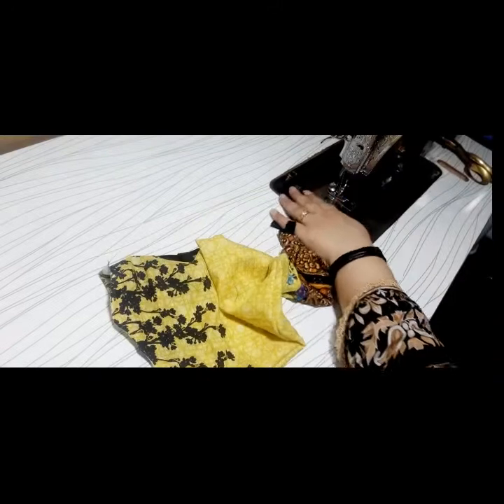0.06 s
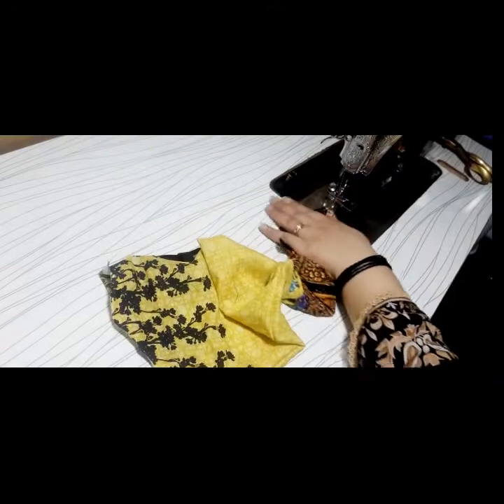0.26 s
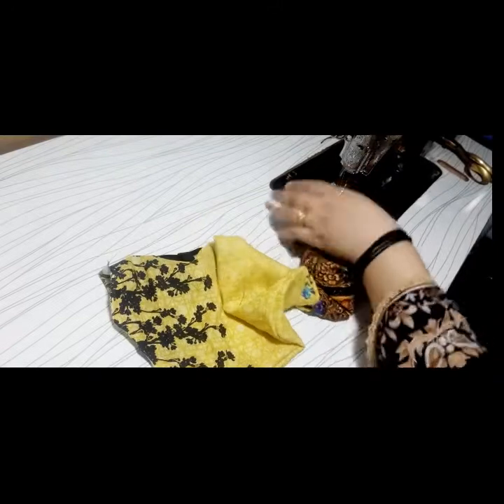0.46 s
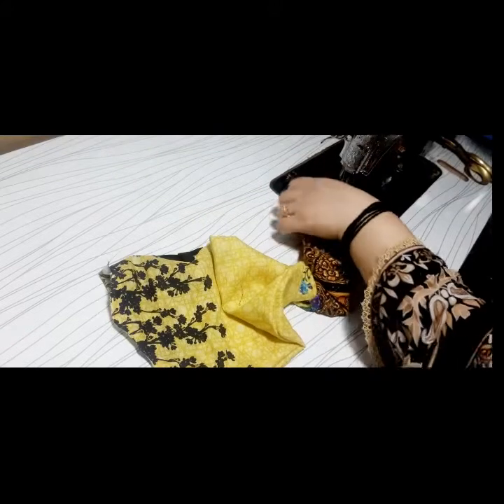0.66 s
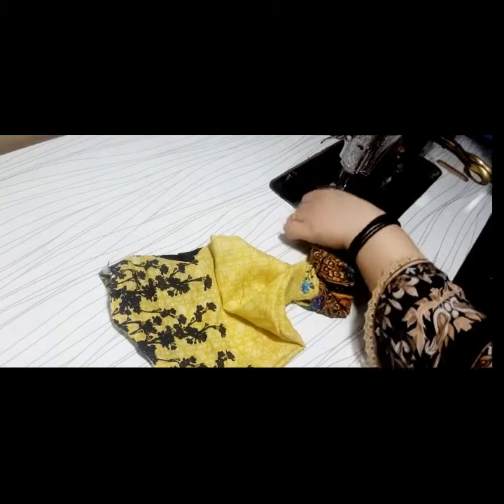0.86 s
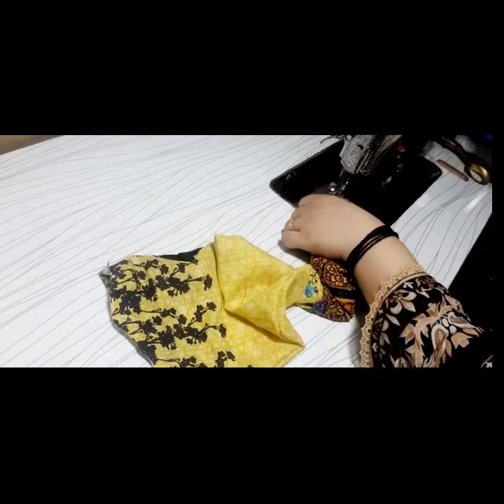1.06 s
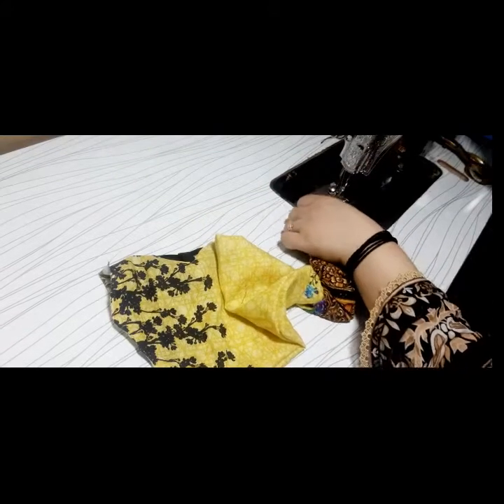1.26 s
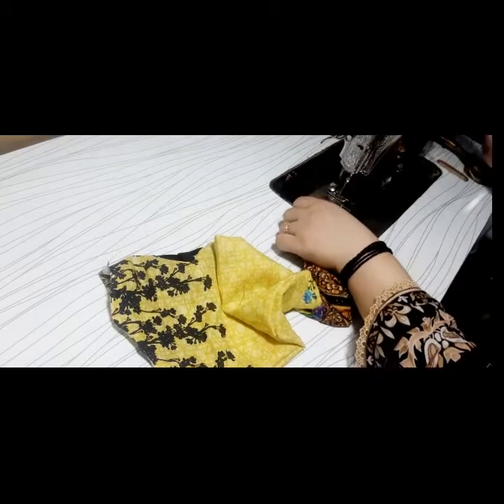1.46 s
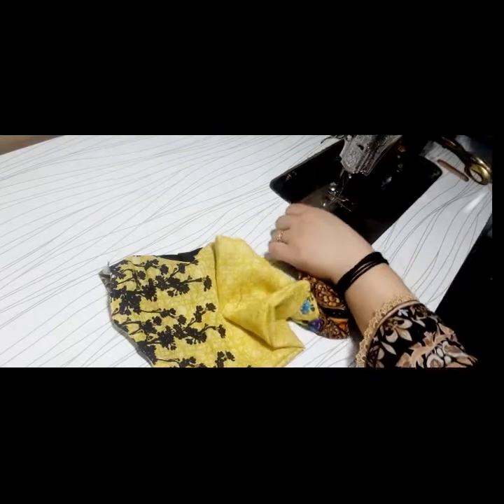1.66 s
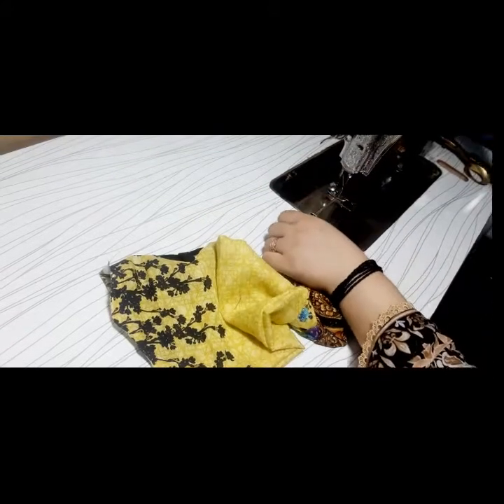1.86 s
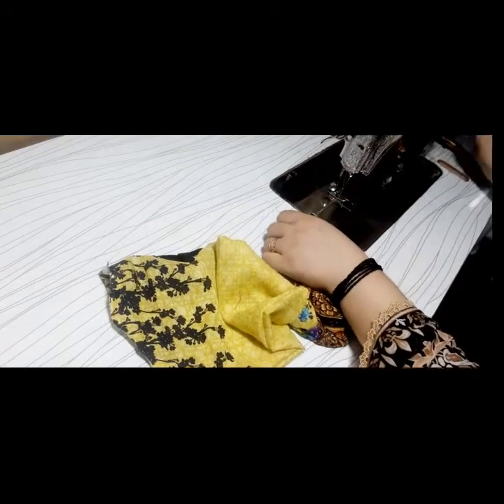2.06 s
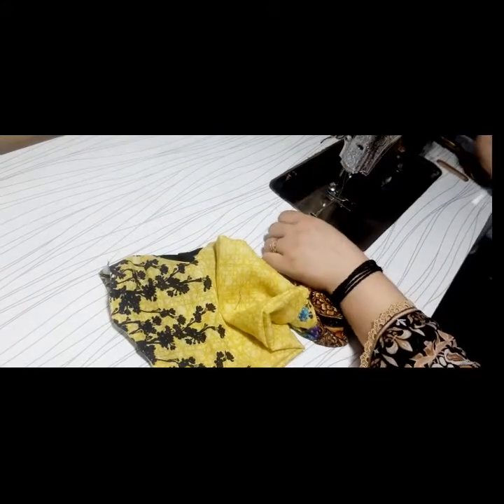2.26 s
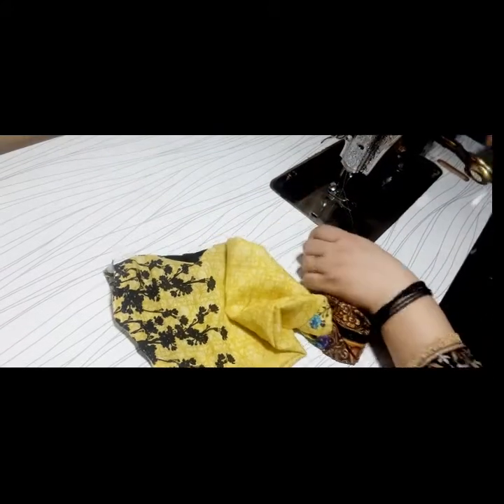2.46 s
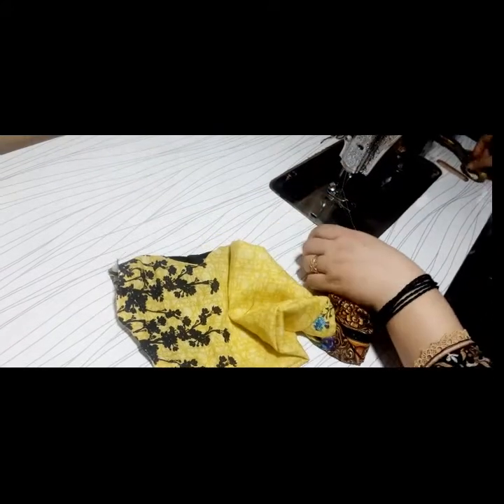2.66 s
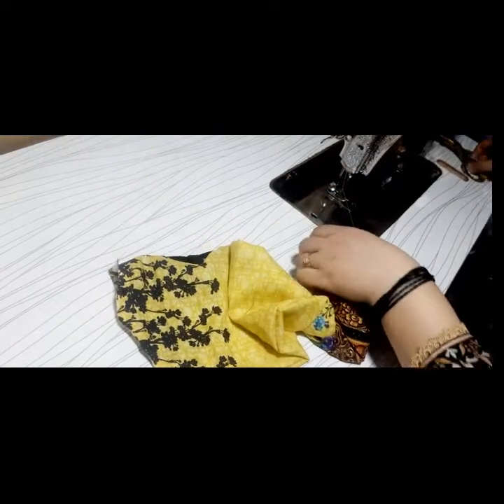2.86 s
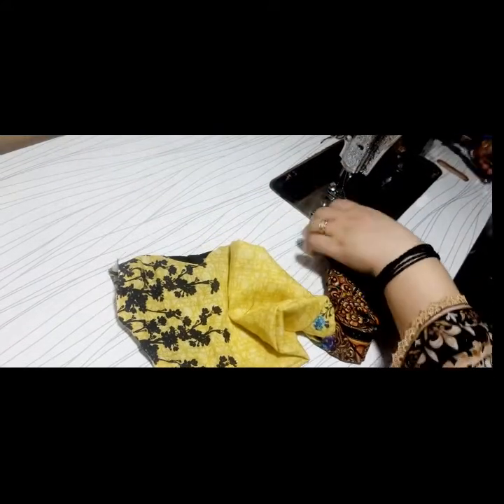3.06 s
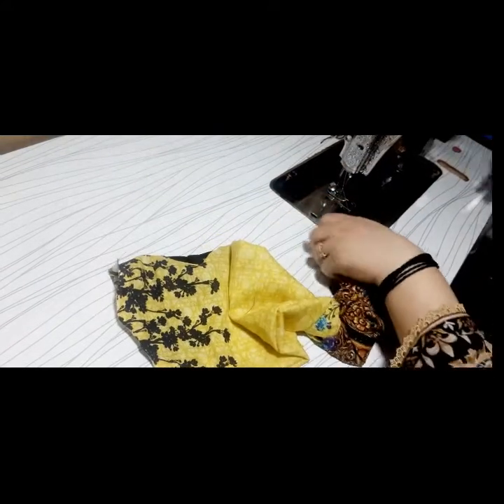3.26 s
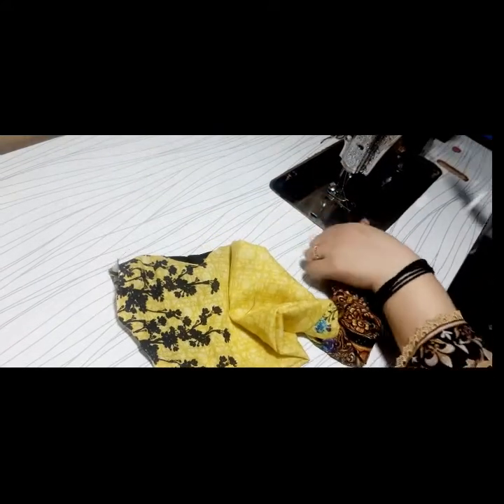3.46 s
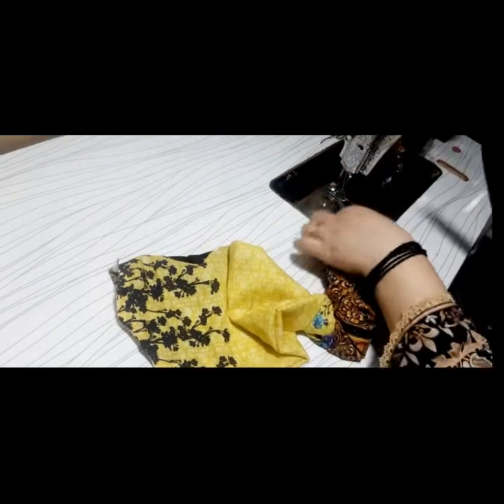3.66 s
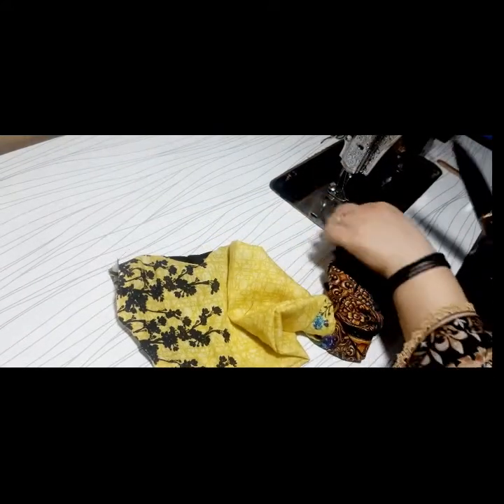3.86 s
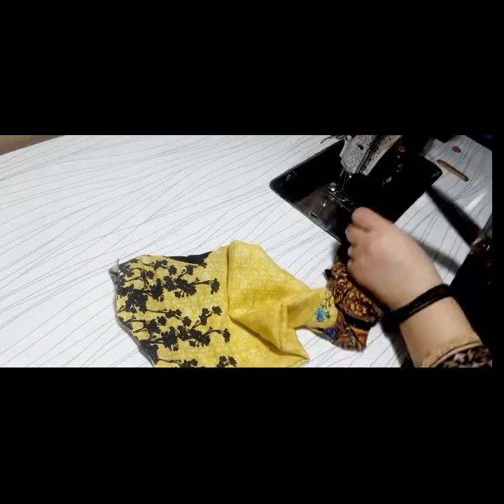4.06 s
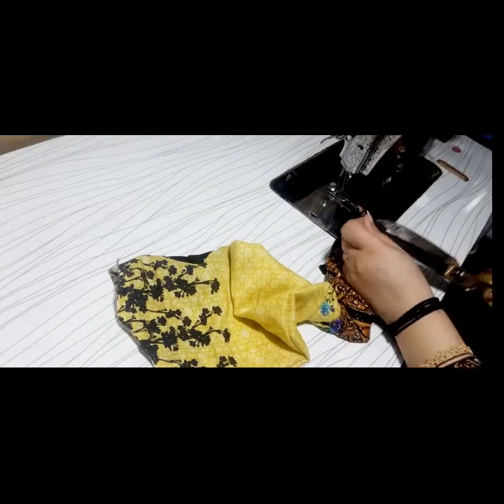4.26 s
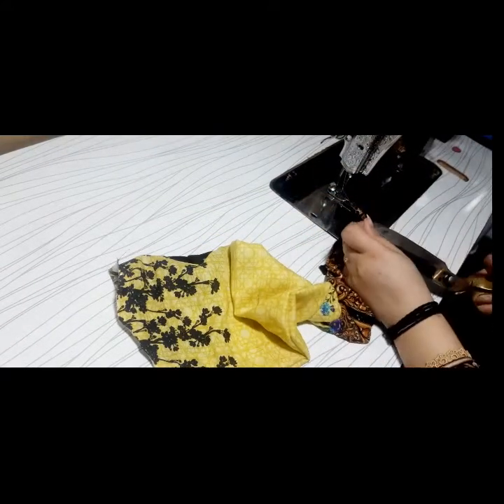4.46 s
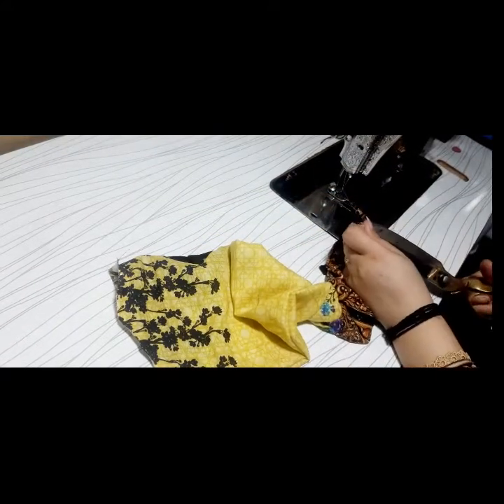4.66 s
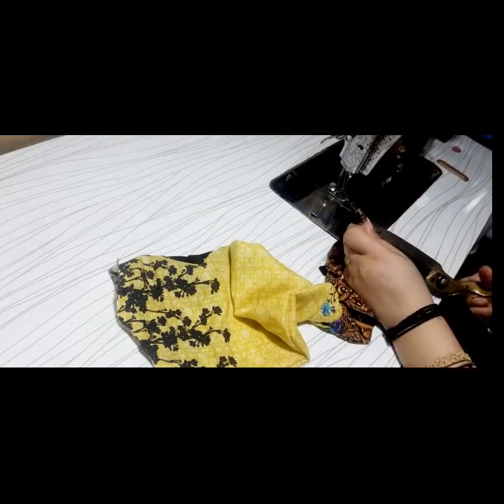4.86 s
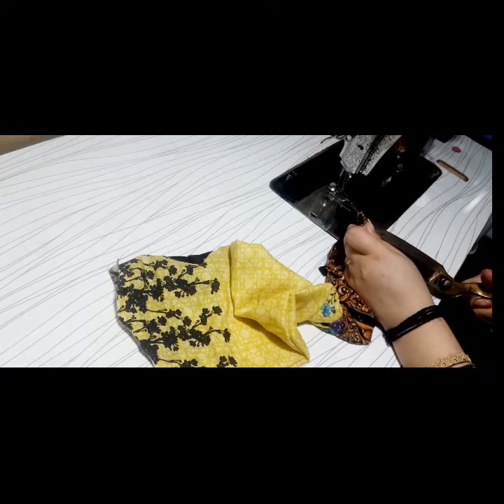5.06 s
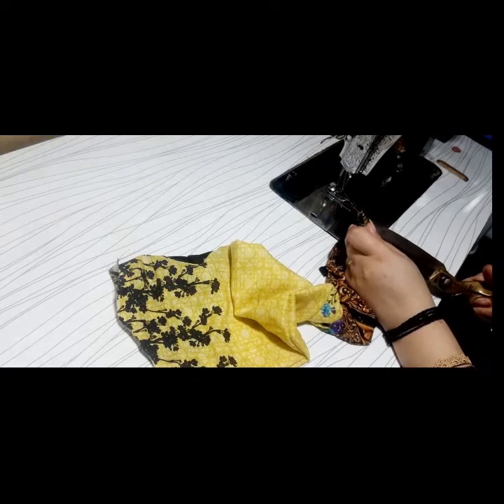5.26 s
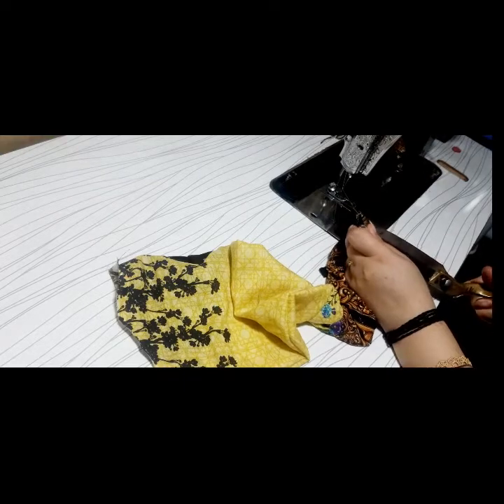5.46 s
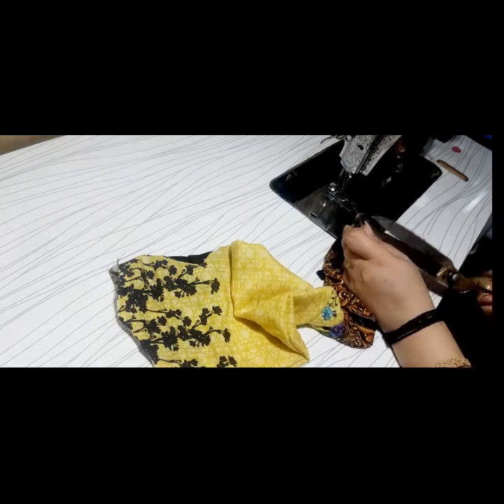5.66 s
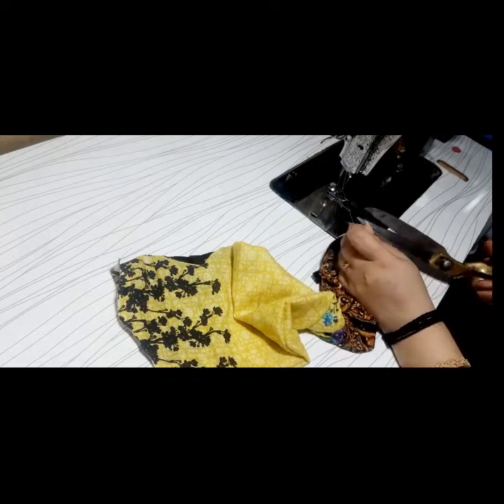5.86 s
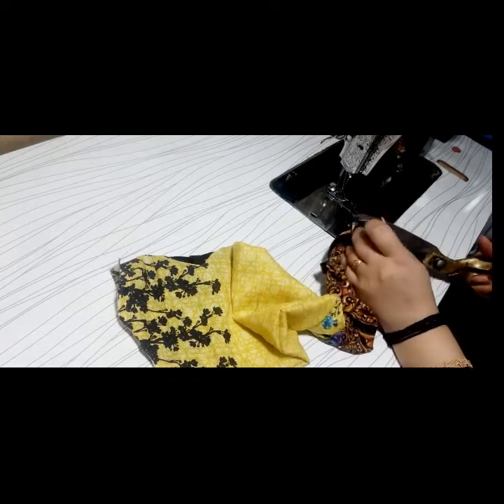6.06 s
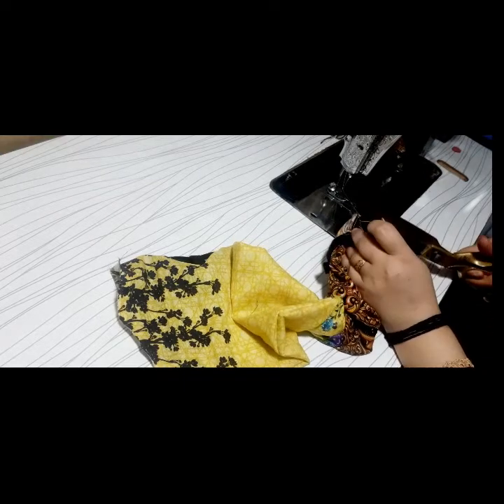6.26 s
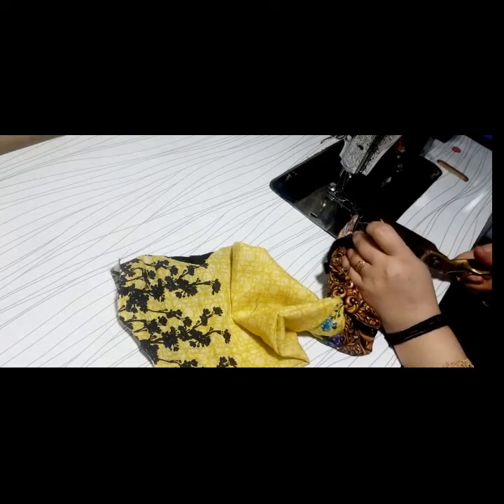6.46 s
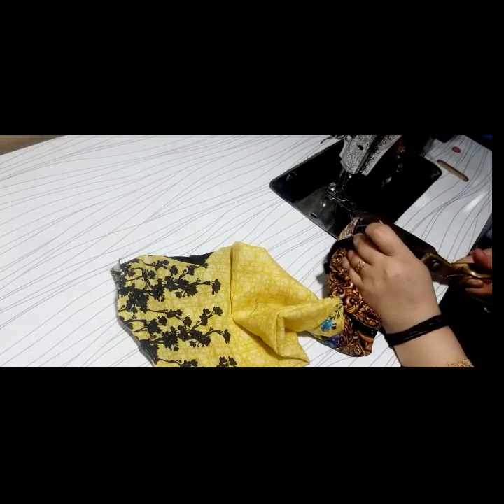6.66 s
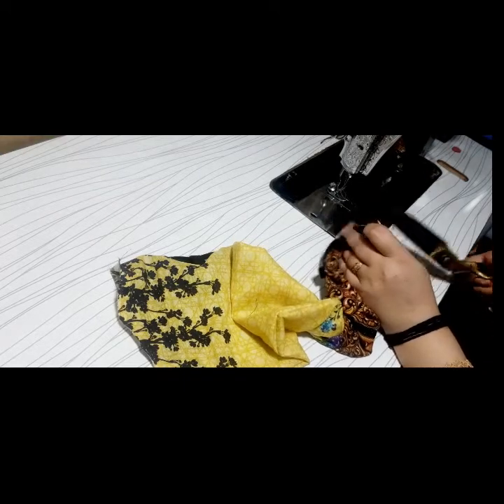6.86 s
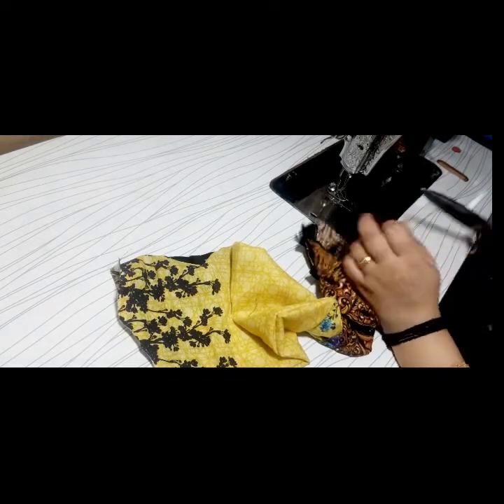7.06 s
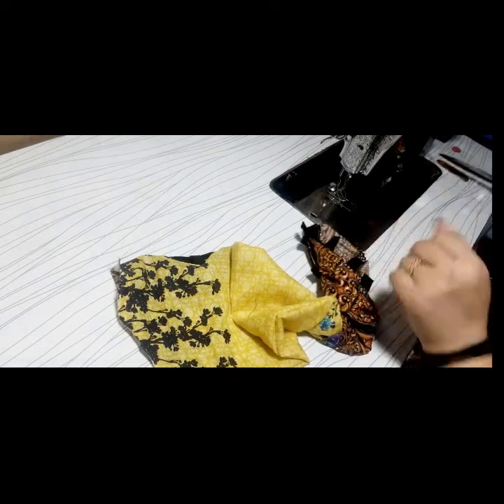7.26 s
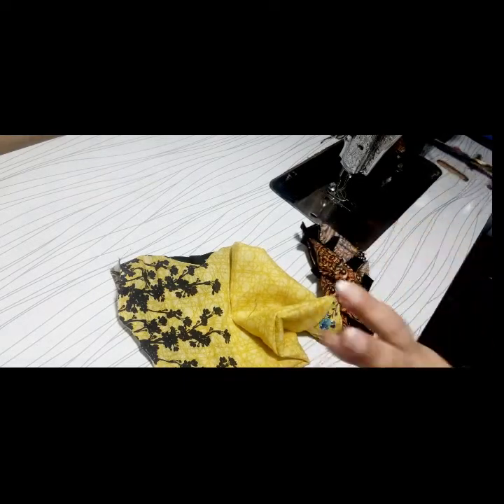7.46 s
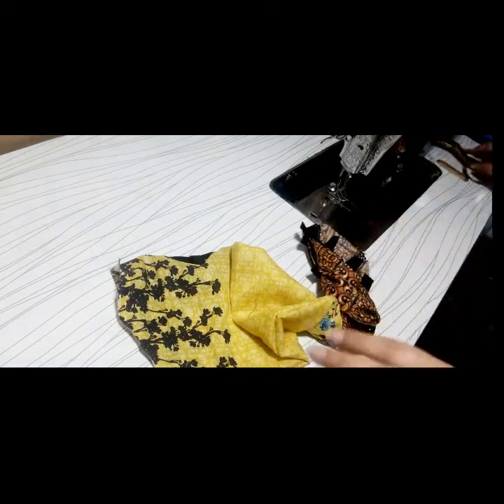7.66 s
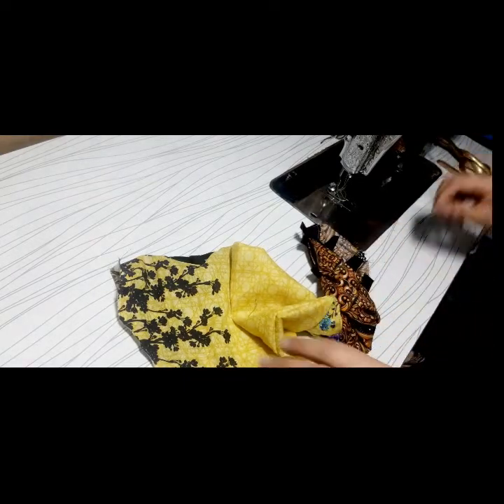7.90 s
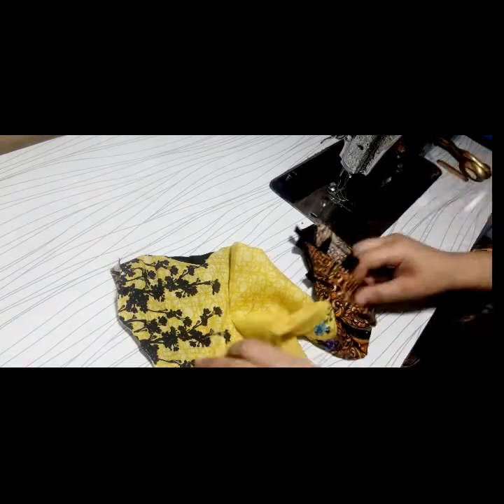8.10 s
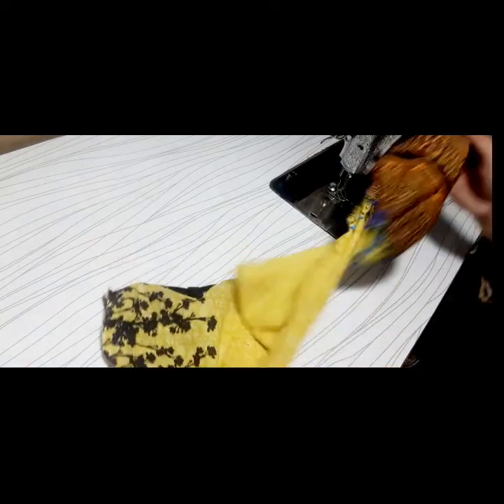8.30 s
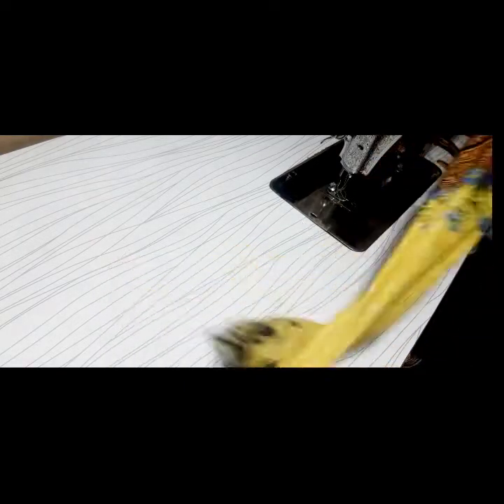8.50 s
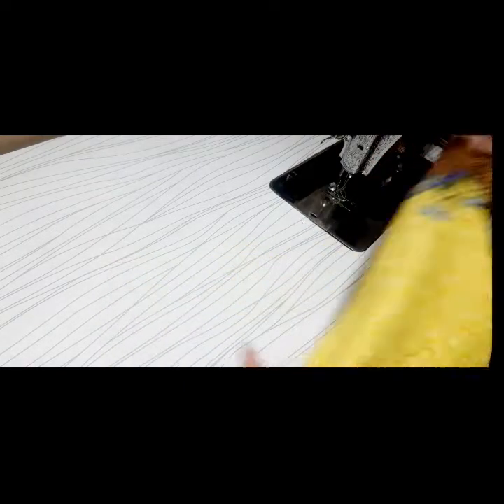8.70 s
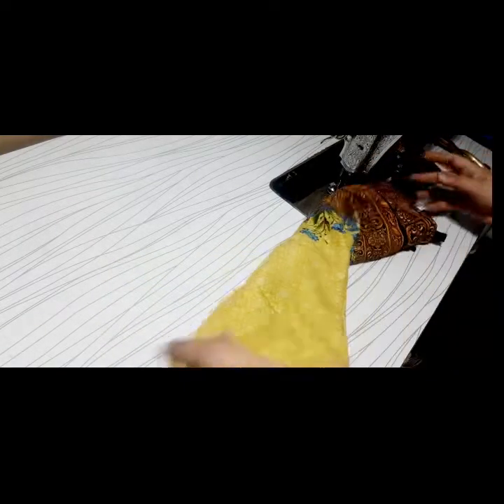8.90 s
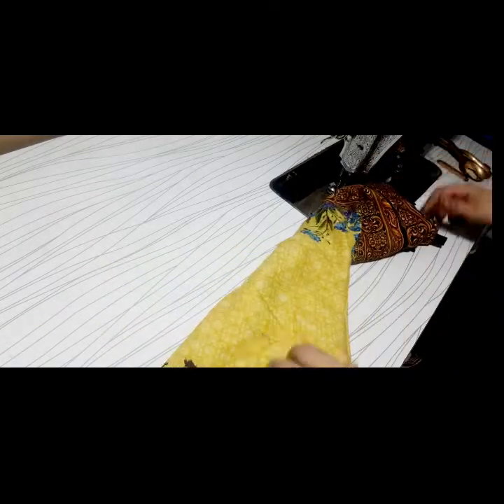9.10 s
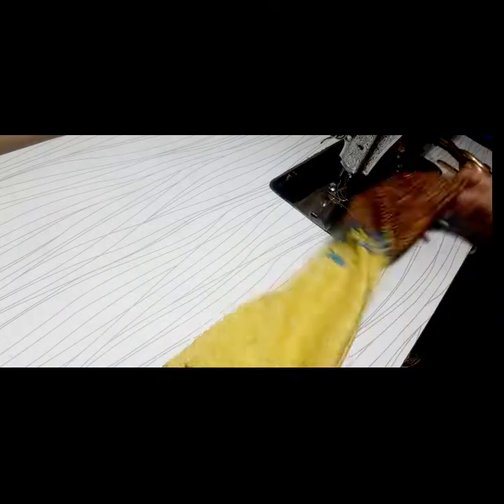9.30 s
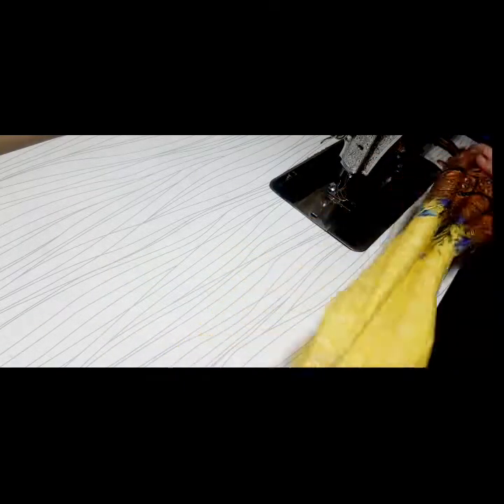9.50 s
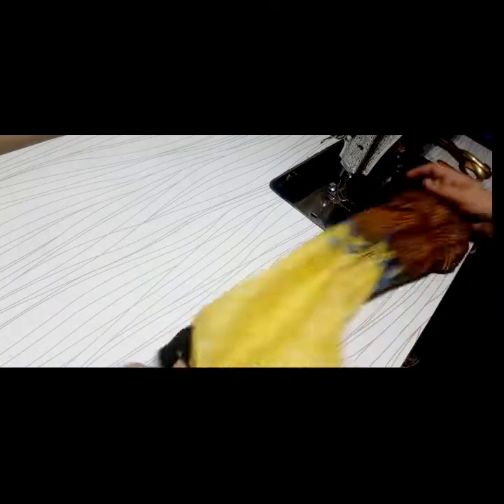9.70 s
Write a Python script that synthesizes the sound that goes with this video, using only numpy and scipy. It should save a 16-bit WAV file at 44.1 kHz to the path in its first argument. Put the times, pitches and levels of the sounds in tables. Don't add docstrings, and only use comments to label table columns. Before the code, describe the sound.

Scissors knock sharply off a wooden table, snip a thread, and land with a hard clack, over rubbing cloth, fan hum and faint cricket chirps.

```python
import sys
import numpy as np
from scipy import signal
from scipy.fft import rfft, irfft, next_fast_len
from scipy.io import wavfile
from scipy.ndimage import uniform_filter1d

SR = 44100
rng = np.random.default_rng(int(sys.argv[2]) if len(sys.argv) > 2 else 0)


def log_audio(samples):
    frames = np.atleast_2d(samples).T
    limited = np.clip(frames, -1, 1)
    pcm = np.round(limited * 32767).astype(np.int16)
    wavfile.write(sys.argv[1], SR, pcm)


def makeup_ratio(level_db):
    decades = np.asarray(level_db, float) / 20
    return 10 ** decades


N = 429534


def evened(x):
    return x / np.sqrt(np.mean(x ** 2) + 1e-20)


def read(points, hz):
    f, value = np.transpose(points)
    return np.interp(np.log(hz + 1), np.log(f + 1), value)


def coloured(z, points):
    gain = makeup_ratio(read(points, np.fft.rfftfreq(len(z), 1 / SR)))
    return evened(irfft(rfft(z) * gain, len(z)))


def add(mix, s, sound):
    part = mix[round(s * SR):][:len(sound)]
    part += sound[:len(part)]


def resonate(x, hz, width):
    return signal.lfilter(*signal.iirpeak(hz, hz / width, SR), x)


def band(x, lo_hz, hi_hz):
    edges = [lo_hz, min(hi_hz, SR / 2 - 100)]
    return signal.sosfilt(signal.butter(2, edges, "band", fs=SR, output="sos"), x)


def drift(per_s, count=N, rate=SR):
    knots = rng.standard_normal(600)
    return 1.03 * np.interp(np.arange(count) / rate * per_s, np.arange(600), knots)


# f/Hz, level/dB per Hz
SIDE_HISS_SPECTRUM = [(880, -44), (1500, -9), (1740, -9.5), (2470, -6.5), (3280, -13.5), (3950, -6.5),
                      (15500, -7)]


def side_hiss():
    z = rng.standard_normal(next_fast_len(N))
    return makeup_ratio(-85.5) * coloured(z, SIDE_HISS_SPECTRUM)[:N]


# f/Hz, level/dB per Hz
AIR_SPECTRUM = [(33, -48), (45, -16), (120, -10.5), (215, -10.5), (287, -3), (404, -7), (500, -7),
                (988, -12.5), (1720, -21.5), (1900, -27.5), (3200, -31), (6600, -29), (9000, -30.5),
                (15500, -38.5)]


def air():
    frames, hz = N // 512 + 5, np.fft.rfftfreq(2048, 1 / SR)
    a, b, patches = rng.standard_normal((frames, 1025, 3)).T
    patches = uniform_filter1d(patches, size=20, axis=0)
    patches = evened(uniform_filter1d(patches, size=10, axis=1))
    patchy_db = 1.5 / (1 + (hz / 2500) ** 2)
    level_db = read(AIR_SPECTRUM, hz)[:, None] + patchy_db[:, None] * patches
    wash = signal.istft((a + 1j * b) * makeup_ratio(level_db), nperseg=2048, noverlap=1536)[1]
    return makeup_ratio(-61) * evened(wash[:N])


def buzz():
    turns = np.arange(N) / SR * 356
    size_db = 3.0 * rng.standard_normal(int(turns[-1]) + 1)[turns.astype(int)]
    size = makeup_ratio(size_db + 4 * (turns // 1 % 3 == 0))
    puffs = size * np.exp(-(turns % 1) / .25) * rng.standard_normal(N)
    return makeup_ratio(-77 + 1.2 * drift(3)) * evened(band(puffs, 12200, 20000))


# f/Hz, level/dB
FAN_TONES = [(50, -79), (139.7, -75), (199.3, -73.5), (255, -74.5), (279.4, -67), (299.2, -66), (399, -67),
             (419.2, -71), (558.5, -69), (676, -76), (743.7, -73.5), (797, -77.5), (965, -73.5),
             (996, -74.5), (1497, -80), (5416, -101.5)]


def fan():
    count, rate = N // 3 + 1, SR / 3
    t = np.arange(count) / rate
    tones = np.zeros(count)
    for hz, db in FAN_TONES:
        level = makeup_ratio(db + 1.5 + 3.14 * drift(10.5, count, rate))
        tones += level * np.sin(2 * np.pi * hz * t + 1.8 * drift(7, count, rate))
    return signal.resample_poly(tones, up=3, down=1)[:N]


# t/s, lead/turns
CHIRP_LEADS = [(0.0, 0.18), (3.0, -0.024), (5.65, 0.15), (6.2, 0.38), (7.9, .35), (8.9, 0.18)]


def cricket():
    t = np.arange(N) / SR
    chirps_per_s = 9.9
    turn = (chirps_per_s * t + np.interp(t, *np.transpose(CHIRP_LEADS)) + 0.322) % 1
    swell = (turn / 0.26) ** 2.0 * np.exp(2.0 * (1 - turn / 0.27))
    strokes = 1 + .45 * np.cos(2 * np.pi * 6 * (turn - .25))
    z = rng.standard_normal(N)
    upper = band(band(z, 7290, 7580), 7290, 7580)
    lower = band(band(z, 7000, 7260), 7000, 7260)
    wing = evened(upper + .45 * lower)
    far_echo = 0.14
    return makeup_ratio(-75.5 + 1.6 * drift(10)) * (swell * strokes + far_echo) * wing


# f/Hz, t60/s
ROOM_DECAY = [(100, 0.12), (500, 0.4), (2000, 0.29), (6000, 0.38), (15000, 0.35)]


def room(x):
    hz, t, z = signal.stft(rng.standard_normal(SR // 2), SR, nperseg=256)
    decay = makeup_ratio(-60 * t / read(ROOM_DECAY, hz)[:, None])
    tail = signal.istft(z * decay, SR, nperseg=256)[1]
    tail *= np.minimum(np.arange(len(tail)) / SR / 0.017, 1)
    return signal.fftconvolve(x, tail / np.linalg.norm(tail))[:N]


# f/Hz, width/Hz, level/dB
CLOTH_HOLLOWS = [(1684, 290, -3), (2380, 550, 2.5), (2850, 450, -7), (4100, 1500, -8)]
# t/s, effort/dB
HAND_EFFORT = [(0.0, -8), (0.3, 0.5), (0.6, -14.5), (0.92, -10.5), (1.4, -11), (1.85, -21), (2.2, -10),
               (2.65, -12), (3.3, -29), (3.9, -12.5), (4.4, -32), (6.5, -24.5), (6.9, -14), (7.2, -22),
               (7.62, -6), (8.3, -17), (9.3, -24.5), (9.65, -12.5)]
# level at full effort/dB, slope/dB per dB of effort
EFFORT_RESPONSE = [(-63, 1.16), (-58.5, 0.45), (-62, 0.7)]
# t/s, rustle level/dB, half length/s
LANDING_JOLT = (7.65, -43, 0.032)


def slide():
    t = np.arange(N) / SR
    effort_db = np.interp(t, *np.transpose(HAND_EFFORT))
    grain = rng.standard_normal(N) * makeup_ratio(1.2 * drift(60))
    rub = np.zeros(N)
    for hz, width, db in CLOTH_HOLLOWS:
        rub += makeup_ratio(db) * resonate(resonate(grain, hz, width), hz, width)
    rustle = grain
    for _ in range(3):
        rustle = band(rustle, 160, 1750)
    rumble = band(rng.standard_normal(N), 47.7, 120)
    layers = [evened(rub), evened(rustle), evened(rumble)]
    jolt_s, jolt_db, half_length = LANDING_JOLT
    out = makeup_ratio(jolt_db) * np.exp(-((t - jolt_s) / half_length) ** 2 * 4) * layers[1]
    for (db, share), spread_db, layer in zip(EFFORT_RESPONSE, (4.0, 1.2, 2.5), layers):
        out += makeup_ratio(db + share * effort_db) * makeup_ratio(spread_db * drift(6.1)) * layer
    return out


# t/s, level/dB, dull part level/dB
CATCHES = [(.5901, -61, 4), (.6429, -63, -11), (.6564, -61, 7), (.7871, -61, 6), (.8545, -60, -1),
           (1.047, -63, 6), (1.1543, -60, 3), (1.2565, -62, -6), (1.4287, -57, -15), (1.505, -54.5, 6),
           (1.5439, -62, -9), (1.8018, -58.5, 12), (2.3201, -69, 3), (4.363, -68, 3), (6.7775, -59, 3.5),
           (7.8471, -60, 4), (7.8989, -62.5, 15), (8.076, -68, 6), (8.098, -66, 9), (8.148, -66, 8)]
# t/s, level/dB, t60/s, dull part level/dB, bright part level/dB
BANGLES = [
    (1.3371, -47.5, .026, -8, -10),
    (1.8457, -62, 0.097, -17, -6),
    (2.1244, -59.5, 0.13, 4, -1),
    (2.578, -63, 0.24, 1, 0.5),
    (2.7525, -54, 0.022, -2, -5),
    (5.215, -67, 0.084, 4, -3),
    (7.6244, -44, 0.044, 9, -23.5),
    (9.128, -48.5, 0.031, -1.5, -10),
]


def ticks():
    t, out = np.arange(8192) / SR, np.zeros(N)
    rows = [(s, db, 2310, .04, dull_db, -12) for s, db, dull_db in CATCHES]
    rows += [(s, db, 3300, *rest) for s, db, *rest in BANGLES]
    chance = rng.standard_normal((len(rows), len(t)))
    for (s, db, hz, t60, dull_db, bright_db), z in zip(rows, chance):
        ringing = resonate(z, hz, 900) + .5 * z
        middle = evened(band(band(ringing, 1900, 4600), 1900, 4600))
        dull = makeup_ratio(dull_db) * evened(band(z, 900, 2000))
        bright = makeup_ratio(bright_db) * evened(band(z, 5000, 15000))
        fade = makeup_ratio(db - 60 * t / max(t60, .005)) * np.minimum(t / .001, 1)
        add(out, s, fade * (middle + dull + bright))
    return out


# t/s, level/dB, f/Hz, width/Hz, t60/s
RINGING_PARTS = [(.976, -61, 3600, 120, 0.27), (.976, -58.5, 2320, 200, 0.085), (1.007, -62, 5300, 200, .08),
                 (1.007, -59, 7700, 200, .06), (2.406, -58.5, 3700, 350, 0.21), (2.407, -59, 2370, 250, 0.2),
                 (8.249, -67, 4660, 30, .28), (8.248, -70, 5900, 30, .25), (8.248, -68, 5370, 30, .2),
                 (8.248, -72, 6250, 30, .2), (1.02, -68, 5900, 500, .15), (2.32, -61.5, 1430, 200, 0.36),
                 (2.862, -43, 980, 150, 0.17), (6.7255, -45.5, 1500, 1200, 0.043),
                 (7.443, -48.5, 1421, 700, 0.1), (7.752, -47, 640, 298, 0.058),
                 (1.802, -54, 1400, 500, 0.094), (2.283, -55, 250, 200, 0.19),
                 (6.7255, -48.5, 250, 300, 0.09), (8.066, -53, 250, 250, 0.19), (1.339, -51, 500, 500, 0.1),
                 (2.83, -50, 1100, 900, .12),
                 (9.1275, -48.5, 5700, 1800, .03),
    (7.7505, -44, 4100, 1400, 0.026),
    (2.7805, -33, 3400, 900, .022),
    (7.6, -27, 1500, 410, 0.082),
    (6.7255, -40, 4400, 700, .025),
    (2.785, -47, 280, 250, .4),
    (2.92, -48, 280, 250, .25),
    (7.445, -45, 320, 250, .2),
    (7.4425, -45, 3600, 1400, .03),
]


def pings():
    t, out = np.arange(8192) / SR, np.zeros(N)
    parts = RINGING_PARTS
    chance = rng.standard_normal((len(parts), 2 * len(t)))
    for (s, db, hz, width, t60), z in zip(parts, chance):
        ring = resonate(z, hz, width)[len(t):]
        add(out, s, makeup_ratio(db - 60 * t / t60) * evened(ring))
    return out


# t/s, crack level/dB, board level/dB, thump level/dB, rattle level/dB
TABLE_KNOCKS = [
    (2.281, -66, -43.5, -57.5, -80),
    (2.7035, -38.5, -37.5, -63, -45),
    (2.7802, -21, -28.5, -49.5, -43),
    (2.8603, -29, -40, -59, -59),
    (2.915, -31.5, -32.5, -55.5, -51),
    (7.442, -26.5, -25.5, -47.5, -44.5),
    (7.5988, -8, -17, -41, -21),
    (7.7508, -31, -32.5, -66.5, -50.5),
    (8.0644, -56, -50, -60.5, -77),
]
# f/Hz, t60/s
TOP_BOUNCE = (111, 0.56)
# t/s, level/dB, f/Hz, length/s
KNEE_BUMP = (3.835, -58, 58, .12)


def thumps():
    t, out = np.arange(SR // 4) / SR, np.zeros(N)
    bounce_hz, bounce_t60 = TOP_BOUNCE
    rise = 1 - np.exp(-(t / 0.017) ** 3)
    caught = 1 + np.exp((t - .098) / .006)
    swing = rise * makeup_ratio(-60 * t / bounce_t60) / caught
    for s, _, _, thump_db, _ in TABLE_KNOCKS:
        add(out, s, makeup_ratio(thump_db + 11.0) * swing * np.sin(2 * np.pi * bounce_hz * t))
    s, db, hz, length = KNEE_BUMP
    lean = np.sin(np.pi * np.minimum(t / length, 1))
    add(out, s, makeup_ratio(db) * lean * np.sin(2 * np.pi * hz * t))
    return out


def rattles():
    t, out = np.arange(8192) / SR, np.zeros(N)
    chance = rng.standard_normal((len(TABLE_KNOCKS), len(t)))
    for (s, *_, rattle_db), z in zip(TABLE_KNOCKS, chance):
        chatter = makeup_ratio(-60 * t / 0.02) * evened(band(z, 2200, 15000))
        shiver = makeup_ratio(-24.5 - 60 * t / 0.37) * evened(band(z, 1200, 7800))
        add(out, s, makeup_ratio(rattle_db) * (chatter + shiver))
    return out


# f/Hz, level/dB per Hz
CRACK_SPECTRUM = [(350, -13), (600, -2), (1530, 4), (2540, -4.5), (3630, 4), (7210, -20.5), (12000, -18),
                  (14300, -48), (16000, -31.5)]
# f/Hz, level/dB, t60/s
BOARD_MODES = [(313, -20, 0.35), (545, -1, 0.15), (612.5, -2.5, 0.16), (805, -17, 0.044), (952, -13, 0.16),
               (1050, -18, 0.047), (1417, -9, 0.072), (1670, -12.5, .06), (1910, -17.5, 0.031)]
# f/Hz, level/dB per Hz
GRAIN_SPECTRUM = [(88, -40.5), (150, -4), (243, -18.5), (617, -6), (682, -3), (779, -0.5), (861, -12),
                  (967, -8), (3000, -29.5), (8000, -44), (10400, -67), (17600, -120)]


def knocks():
    t, out = np.arange(SR // 3) / SR, np.zeros(N)
    log_gain = read(CRACK_SPECTRUM, abs(np.fft.fftfreq(2048, 1 / SR))) * np.log(10) / 20
    crack = -np.fft.ifft(np.exp(signal.hilbert(log_gain).conj())).real[:1024]
    crack /= abs(crack).max()
    rested = 1 - .6 / (1 + np.exp(-(t - .016) / .0015))
    fill = 1 - np.exp(-(t / 0.003) ** 2)
    chance = rng.standard_normal((len(TABLE_KNOCKS), 3, len(t)))
    for (s, crack_db, board_db, thump_db, _), (spot, detune, z) in zip(TABLE_KNOCKS, chance):
        add(out, s, makeup_ratio(crack_db + 1.5) * crack)
        ring = np.clip(1.21 + .015 * (thump_db - board_db), .5, 1)
        modes = np.zeros(len(t))
        for (hz, db, t60), a, b in zip(BOARD_MODES, spot, detune):
            level = makeup_ratio(db + 2.0 * a - 60 * t / (ring * t60))
            modes += level * np.sin(2 * np.pi * hz * (1 + 0.0062 * b) * t)
        dense_fade = makeup_ratio(-1.0 - 60 * t / (ring * 0.047)) + makeup_ratio(-12 - 60 * t / (ring * 0.34))
        dense = coloured(z, GRAIN_SPECTRUM) * dense_fade
        add(out, s, makeup_ratio(board_db - 2.5) * (rested * modes + dense) * fill)
    return out


# t/s, level/dB, shrillness/dB, length/s, strongest ring f/Hz
BLADE_STROKES = [(1.005, -64, 0, .014, 4960), (2.829, -56, -4, .024, 3920), (2.845, -51.5, 6, 0.0066, 4100),
                 (2.859, -36.5, -3.5, 0.0037, 4750), (4.096, -72, 11, 0.011, 3240),
                 (4.115, -59, 6, .02, 3140), (5.114, -72, -6, .026, 3180), (5.15, -66.5, 1.5, .042, 3740),
                 (5.475, -56, 3, 0.0053, 3240), (5.632, -53.5, 3, 0.026, 2800),
                 (5.659, -61, -6, .014, 3700), (5.672, -73, -9, .11, 3300), (6.662, -67, 3, .0054, 3860),
                 (6.676, -62.5, 2, .027, 3090), (6.707, -57, 4, 0.016, 2870),
                 (6.718, -51, 4.5, 0.0093, 2950), (6.933, -71, -12, .1, 2490),
                 (7.607, -39.5, -4, 0.0081, 3380), (8.245, -62.5, 1, .013, 4800),
                 (9.138, -71, -2, .07, 2700)]
# f/Hz, width/Hz, level/dB
BLADE_MODES = [(2800, 130, -24.5), (3240, 180, -2), (3720, 200, -8), (4420, 150, -1), (5830, 200, 3.5),
               (7290, 210, 2), (8800, 360, 2), (10000, 100, -6.5), (13100, 400, 2.5)]
# t/s, level/dB
SHUT_SNAP = (6.7255, -23)
# f/Hz, width/Hz, level/dB
SHUT_MODES = [(2890, 157, 1), (3780, 114, -6), (4130, 250, -1.5), (6500, 140, -8.5), (7000, 95, -11.5),
              (7900, 95, -12.5), (8700, 210, -24), (10670, 330, -7)]


def blades():
    t, out = np.arange(8192) / SR, np.zeros(N)
    chance = rng.standard_normal((len(BLADE_STROKES), 2 + len(BLADE_MODES), len(t)))
    for (s, db, shrill_db, length, ring_hz), (z, size, *travel) in zip(BLADE_STROKES, chance):
        slips = z * makeup_ratio(3.4 * size)
        grip = 5 * evened(uniform_filter1d(np.array(travel), size=300, axis=1))
        rings = [makeup_ratio(mode_db + grip_db) * resonate(slips, hz, width)
                 for (hz, width, mode_db), grip_db in zip(BLADE_MODES, grip)]
        loose = .3 + 15 * length
        strongest = 1.05 * resonate(slips, ring_hz, 150)
        low = evened(sum(rings[:4]) + strongest + loose * band(slips, 2200, 5200))
        high = evened(sum(rings[4:]) + band(slips, 5000, 12000))
        swell = np.minimum(t / max(0.27 * length, .0005), 1)
        stroke = swell * makeup_ratio(-60 * np.maximum(t - length, 0) / 0.019)
        add(out, s, makeup_ratio(db) * stroke * (low + makeup_ratio(shrill_db) * high))
    shut = np.zeros(len(t))
    for hz, width, db in SHUT_MODES:
        shut += makeup_ratio(db) * np.exp(-np.pi * 1.2 * width * t) * np.sin(2 * np.pi * hz * t)
    snap_s, snap_db = SHUT_SNAP
    add(out, snap_s, makeup_ratio(snap_db) * shut * np.minimum(t / 0.00074, 1))
    return out


def scene():
    background = air() + buzz() + fan() + cricket()
    table = knocks()
    held = ticks() + pings() + rattles() + blades()
    echo = room(makeup_ratio(-12.0) * table + makeup_ratio(-35) * held)
    mid = background + slide() + thumps() + echo + held + table
    return np.array([mid, mid])


def roll_off(x):
    return signal.sosfilt(signal.butter(12, 16550, fs=SR, output="sos"), x)


def record(dry):
    side = side_hiss()
    limit = signal.firwin(201, 15620, window=("kaiser", 3), fs=SR)
    mix = signal.oaconvolve(dry + [side, -side], limit[None], "same")
    return roll_off(mix)


dry = scene()
out = record(dry)
log_audio(out)
```